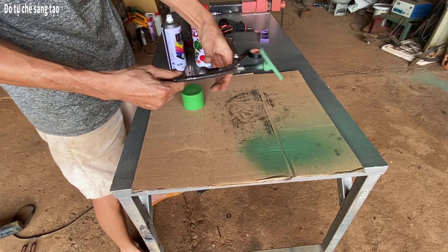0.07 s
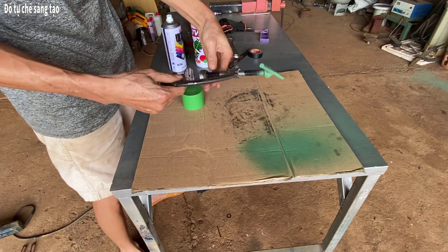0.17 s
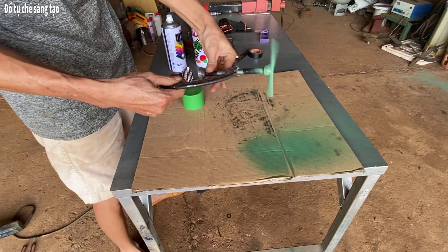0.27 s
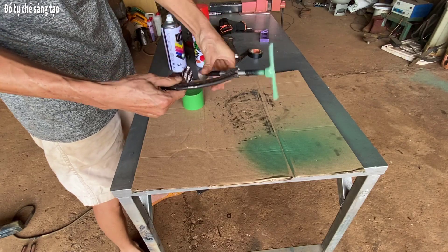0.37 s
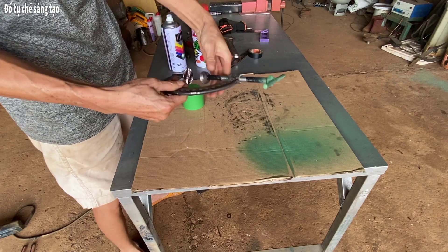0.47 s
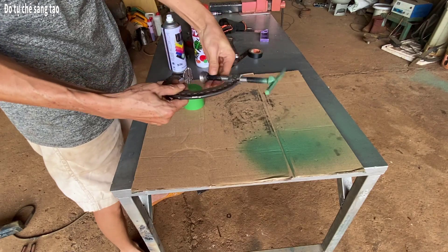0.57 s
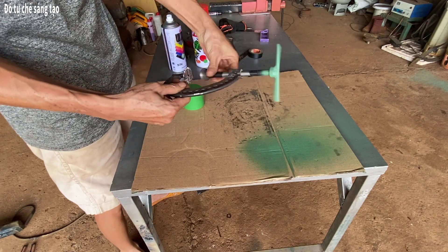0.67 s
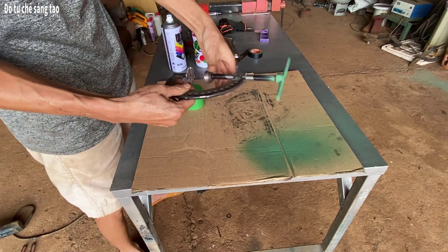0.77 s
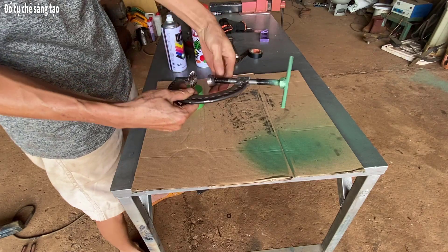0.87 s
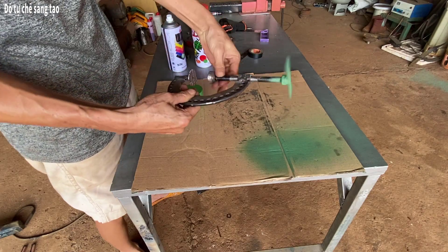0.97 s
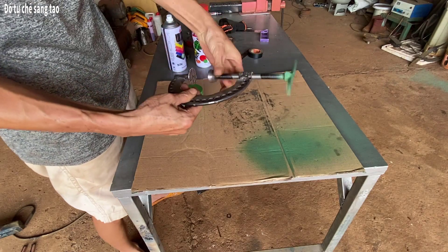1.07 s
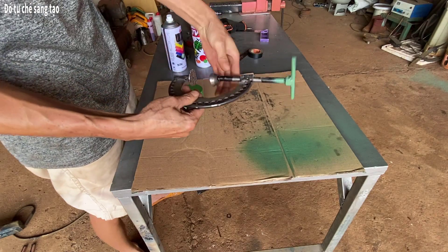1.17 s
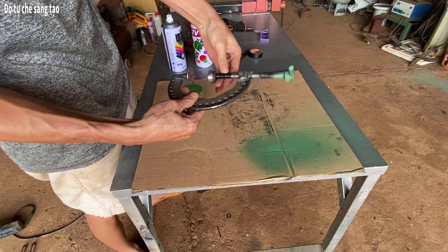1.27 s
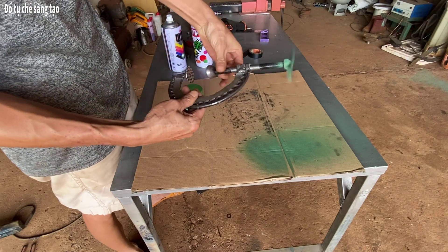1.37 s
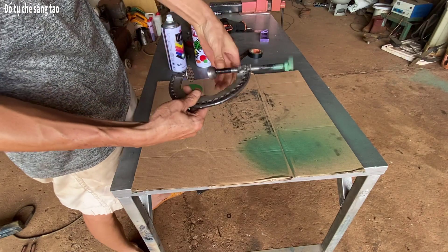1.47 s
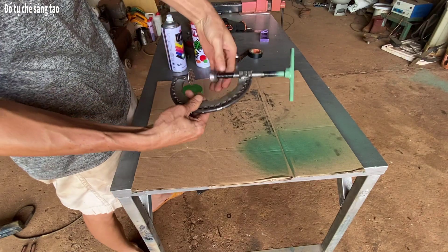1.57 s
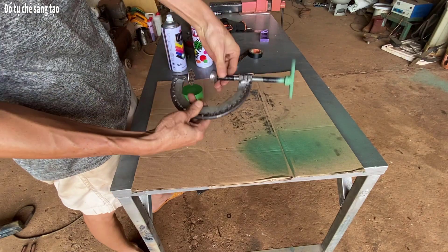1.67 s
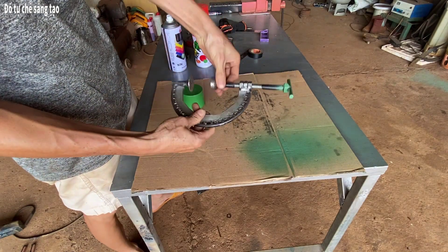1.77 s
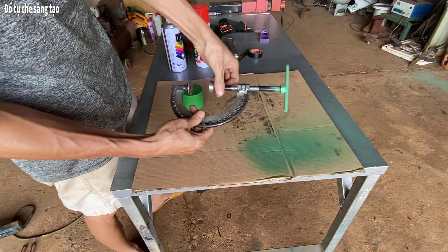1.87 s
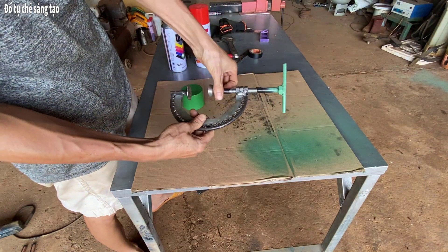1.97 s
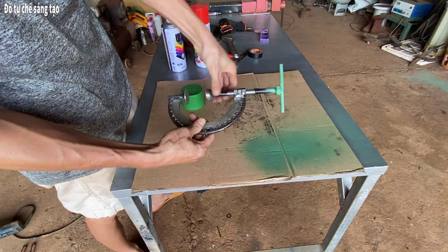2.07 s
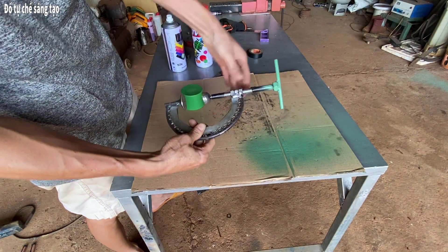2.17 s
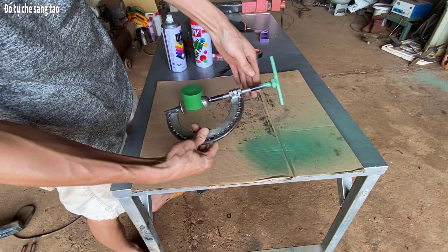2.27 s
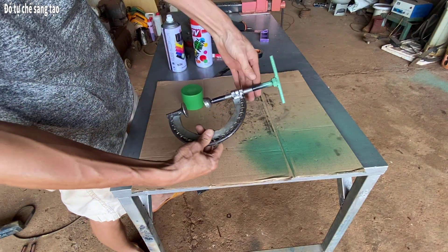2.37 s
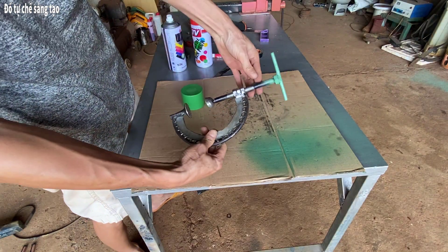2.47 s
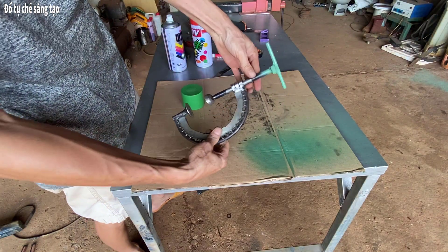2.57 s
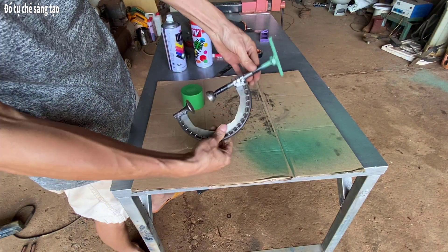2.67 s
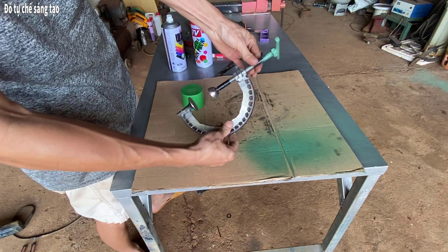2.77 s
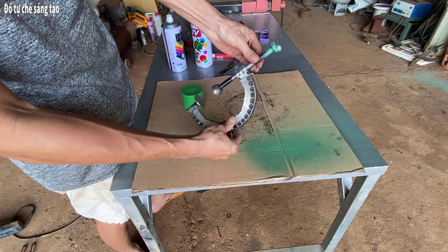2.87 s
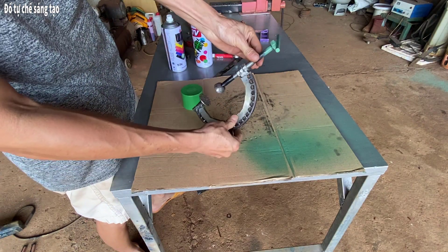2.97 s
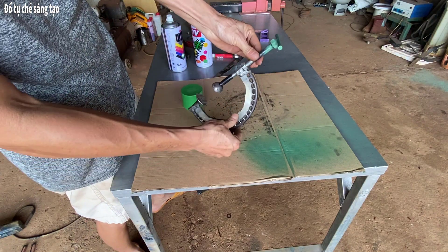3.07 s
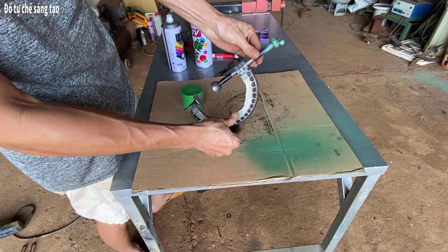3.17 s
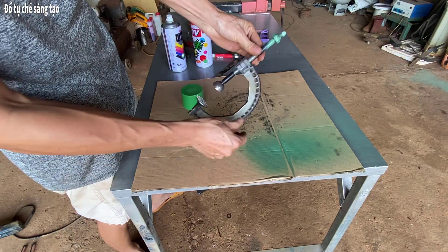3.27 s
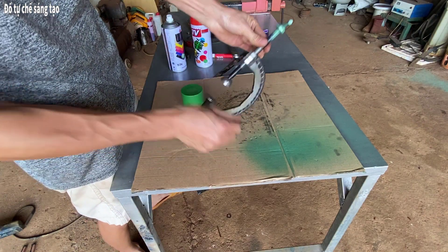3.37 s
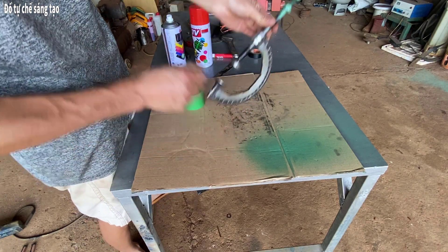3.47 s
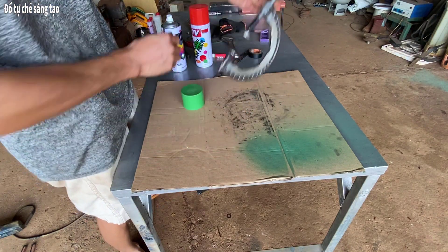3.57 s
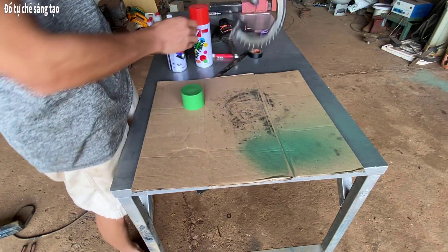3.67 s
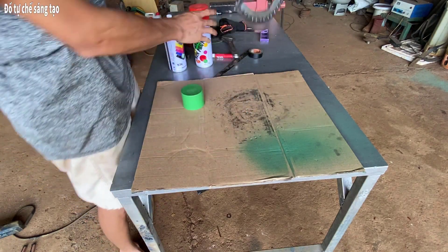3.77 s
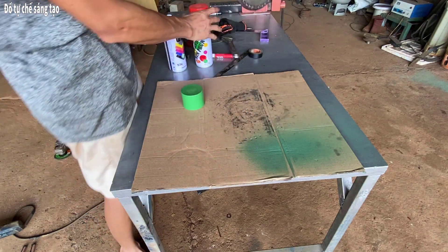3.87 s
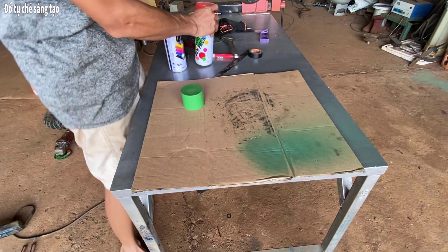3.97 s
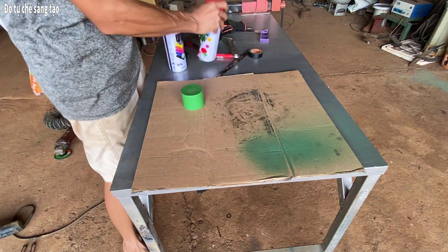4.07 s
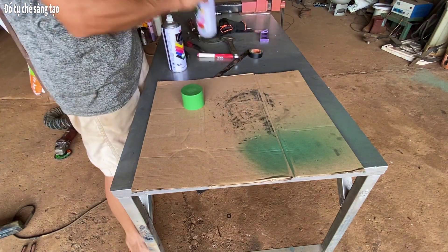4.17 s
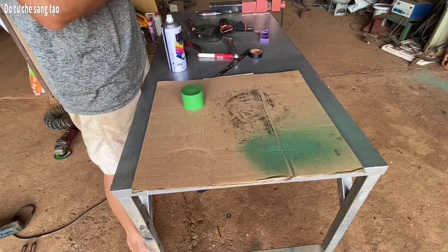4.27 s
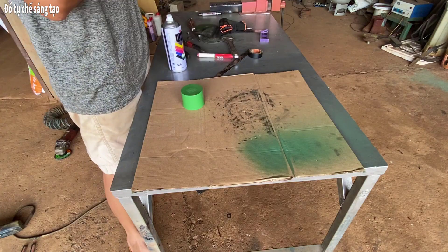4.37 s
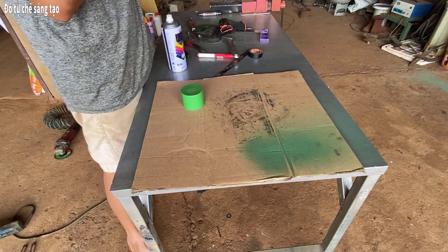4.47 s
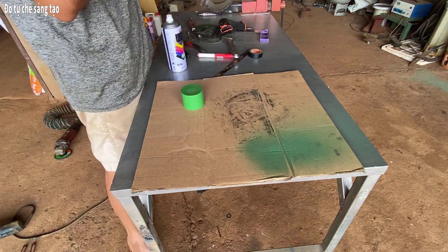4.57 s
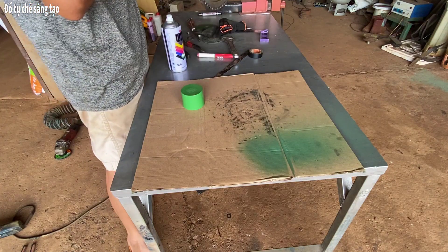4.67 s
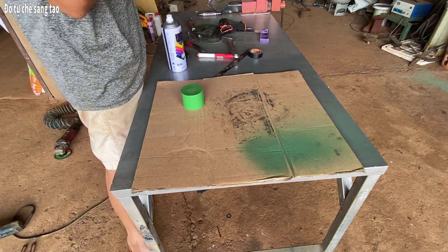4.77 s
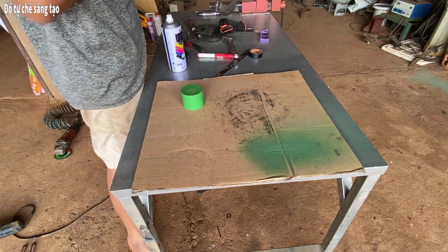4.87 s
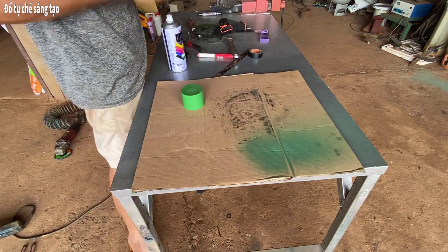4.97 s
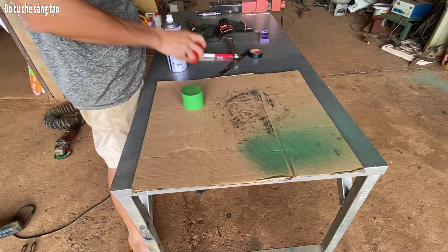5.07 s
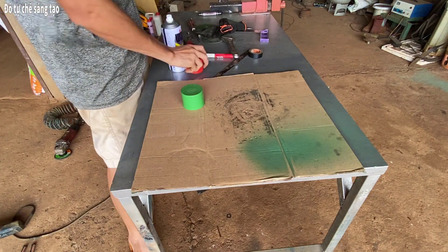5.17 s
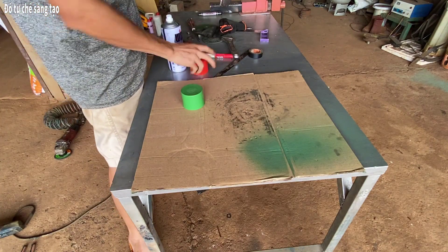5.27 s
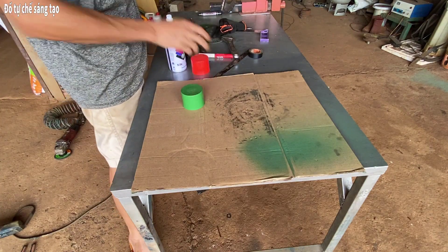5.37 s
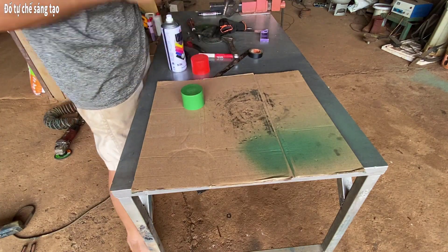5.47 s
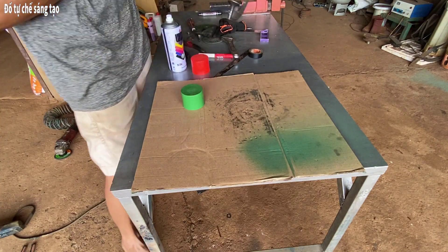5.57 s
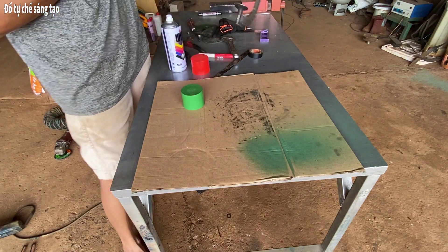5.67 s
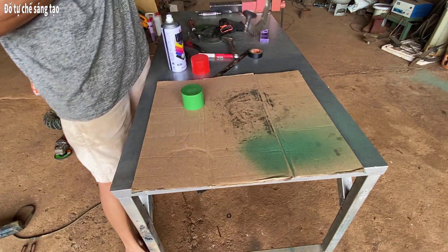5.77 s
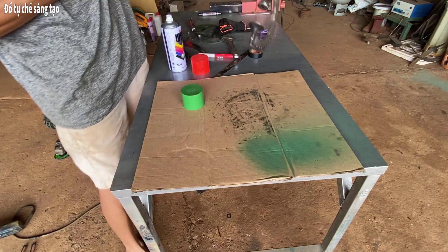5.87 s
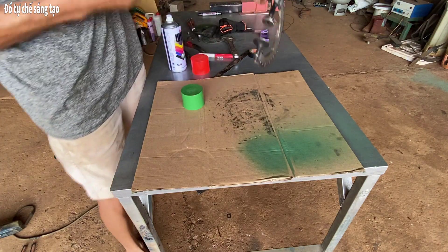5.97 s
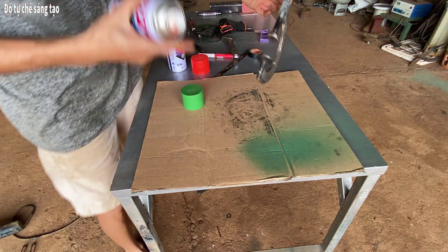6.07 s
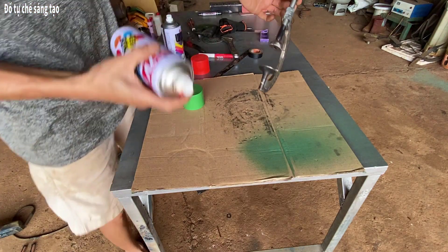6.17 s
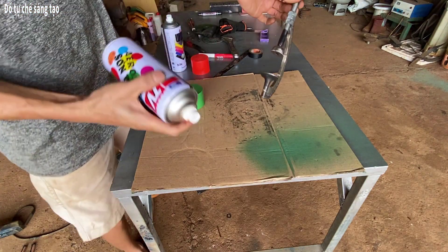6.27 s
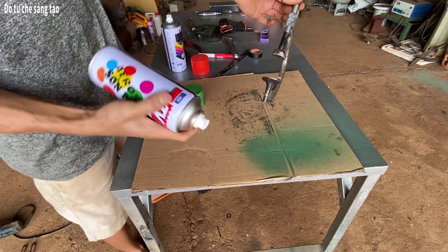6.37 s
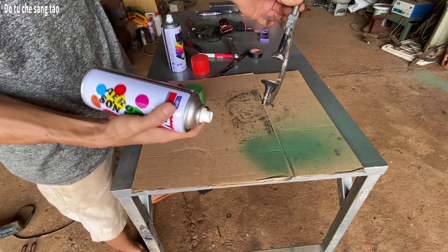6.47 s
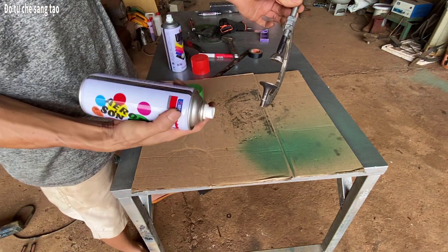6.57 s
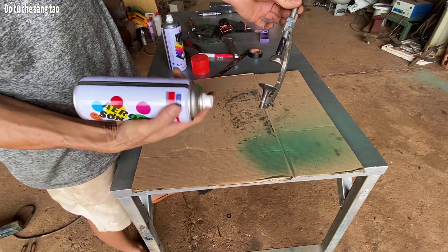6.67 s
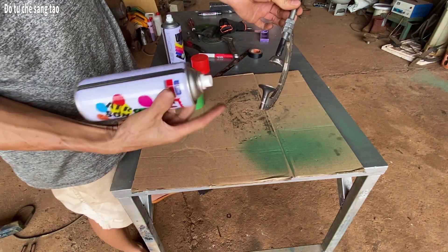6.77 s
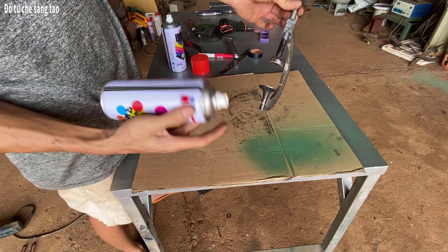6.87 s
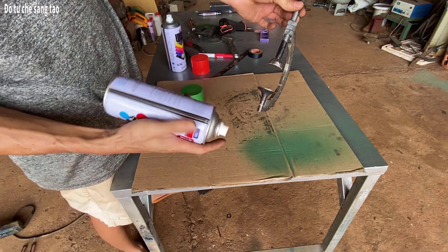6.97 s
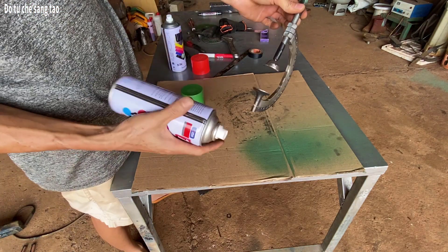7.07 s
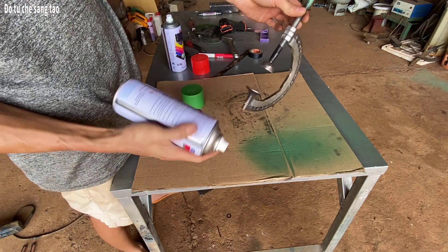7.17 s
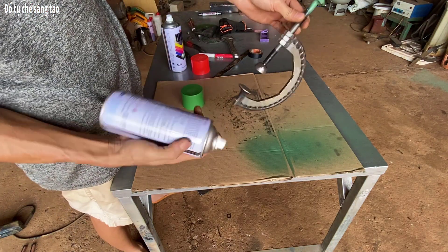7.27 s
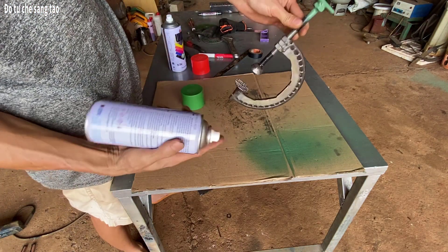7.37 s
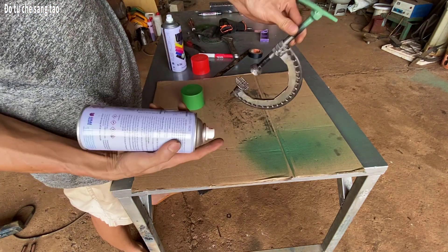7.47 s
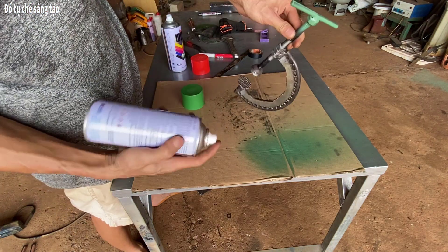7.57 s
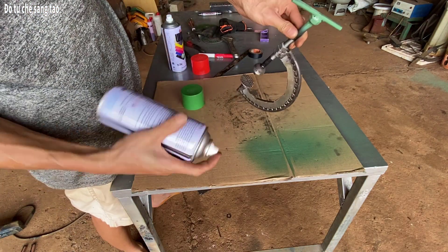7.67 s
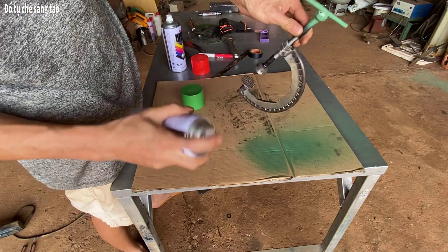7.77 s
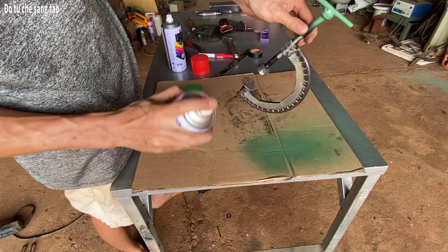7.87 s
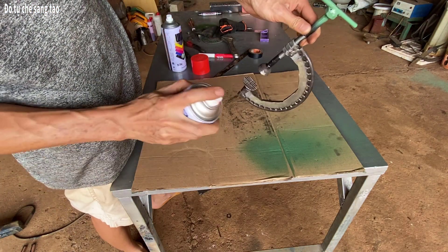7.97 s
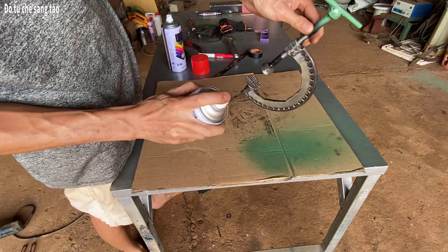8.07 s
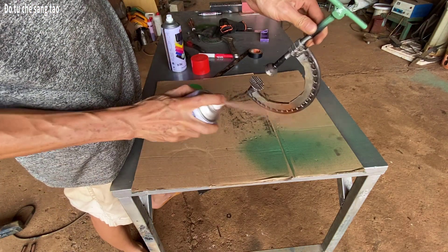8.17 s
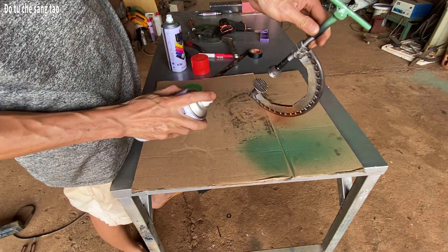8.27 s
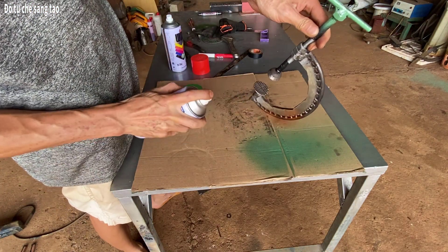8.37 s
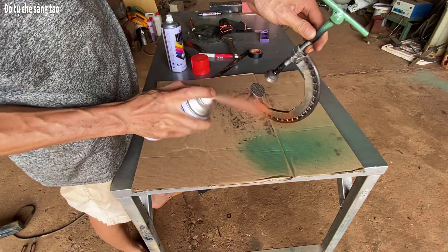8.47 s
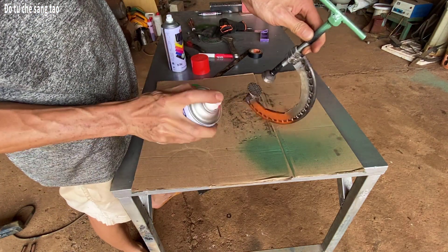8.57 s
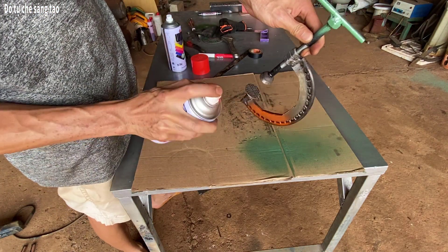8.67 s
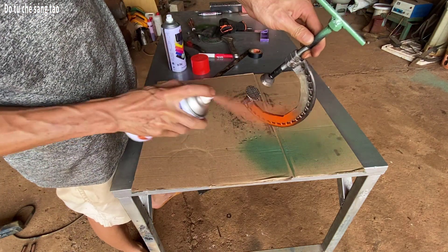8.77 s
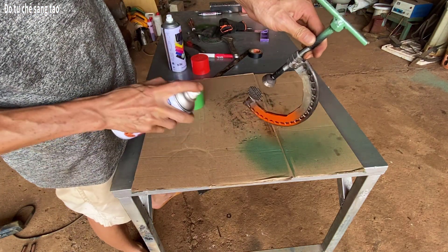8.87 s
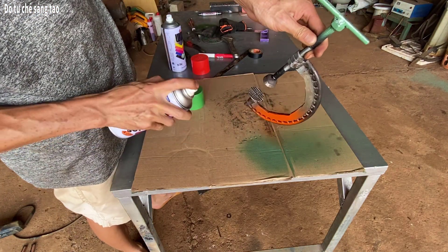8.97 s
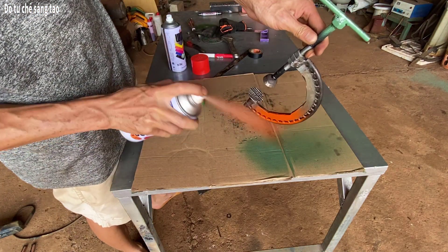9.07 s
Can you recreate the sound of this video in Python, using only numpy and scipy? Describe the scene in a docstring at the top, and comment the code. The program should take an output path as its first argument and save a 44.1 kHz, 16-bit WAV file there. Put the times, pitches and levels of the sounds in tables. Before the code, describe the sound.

A workshop heard close in stereo, with soft low rumble, airy hiss and a wavering low hum, strongest at first; the rumble pulses faintly for two seconds. From 0 to 1.7 s a loose clamp handle gives tiny bright metallic ticks, slightly left; a faint hoarse bird whistle falls, then rises around 0.8-1.2 s. It is nearly quiet until 3.75 s, when a light clank and a dull thud at 3.96 lead to clustered tool clanks, plastic snaps and short scrapes at 4.35-4.9, with a firm thud at 4.77. A hollow cap taps at 5.27 and bounces and skids by 5.42. The can's ball cracks hard at 6.43 and 7.06, each followed by irregular dry knocks and rolling, ending near 7.7. From 8.11 button clicks accompany short sputtering bright hisses at 8.13, 8.36 (very brief), 8.47, 8.74 and 9.05, with a slight room wash.

```python
"""Clanks and thuds on a steel bench, a ball knocking in a spray can and short nozzle hisses in a workshop.
Before them a clamp screw ticks and a bird calls; a plastic cap is popped and set down; rumble, hiss and hum go on.
Blows ring damped modes under a noise crack; slides and rolling are gritty noise; the jet is sputtering noise.
Two microphone ports hear most near sources with their own phase and level; a room wash follows."""
import sys
import numpy as np
from scipy import signal
from scipy.fft import rfft, irfft, next_fast_len
from scipy.io import wavfile
from scipy.ndimage import uniform_filter1d

SR = 44100
rng = np.random.default_rng(int(sys.argv[2]) if len(sys.argv) > 2 else 0)


def pcm_store(signal):
    """Save signal as 16-bit PCM."""
    levels = np.round(np.clip(np.atleast_2d(signal), -1, 1) * 32767)
    wavfile.write(sys.argv[1], SR, levels.astype(np.int16).T)


N = 402612
T = np.arange(N) / SR
SIZE = next_fast_len(N + SR)
F = np.maximum(np.arange(SIZE // 2 + 1) * SR / SIZE, 1)  # FFT bins [Hz], kept off zero for logs

# Ringing modes of the spray can: (frequency [Hz], level [dB], t60 [s])
CAN_MODES = [(850, -3, .03), (1450, -3, .035), (1900, -2, .025), (2557, 4, .03), (2885, 4, .035),
             (3386, 4, .028), (3700, 3, .022), (4250, 4, .024), (4950, 3, .022), (5670, 2, .024),
             (6350, 1, .014), (8050, 2, .016), (9160, 3, .01)]


def undb(db):
    """Gain of a level in dB."""
    return 10 ** (np.asarray(db) / 20)


def unit(x):
    """Scaled to rms 1."""
    return x / np.sqrt(np.mean(x ** 2))


def shaped(x, gain):
    """Sound filtered by a gain for each frequency of F."""
    return irfft(rfft(x, SIZE) * gain, SIZE)[..., :N]


def colour(points):
    """Gain on F, interpolated in dB over log frequency."""
    hz, db = np.transpose(points)
    return undb(np.interp(np.log(F), np.log(hz), db))


def band(hz, octaves):
    """Bell-shaped gain on F."""
    return np.exp(-.5 * (np.log2(F / hz) / octaves) ** 2)


def passband(x, lo_hz, hi_hz):
    """Band-pass, peak 1."""
    edges_hz = np.clip([lo_hz, hi_hz], 50, .45 * SR)
    y = signal.sosfilt(signal.butter(3, edges_hz, "band", fs=SR, output="sos"), x)
    return y / abs(y).max()


def gains(table):
    """Each dB column of a curve as a gain in time, all but silent (-200 dB) outside its span."""
    s, *columns = np.transpose(table)
    return [undb(np.interp(T, s, db, -200, -200)) for db in columns]


def held(start_s, hold_s, db, attack_s, fade_db_per_s):
    """Gain in time of events that rise, hold and fade."""
    age_s = T - np.array(start_s)[:, None]
    fade_s = np.clip(age_s - attack_s - np.array(hold_s)[:, None], 0, 1)
    rise = np.clip(age_s / attack_s, 0, 1) ** 2
    return (undb(db)[:, None] * rise * undb(-fade_db_per_s * fade_s)).sum(axis=0)


def walk(rate_hz):
    """Random levels, held 1 / rate and slewed twice, rms 1."""
    k = int(SR / rate_hz)
    steps = np.repeat(rng.standard_normal(N // k + 1), k)
    return unit(uniform_filter1d(uniform_filter1d(steps, k), k)[:N])


def grit(hz, octaves, rate_hz, spread_db, smooth_db):
    """Tiny uneven contacts over a smooth rub, in one broad band, rms 1."""
    contacts = rng.random(N) < rate_hz / SR
    sizes = undb(spread_db * np.minimum(rng.exponential(size=N), 3))
    hits = contacts * sizes * rng.standard_normal(N)
    rub = undb(smooth_db) * rng.standard_normal(N)
    return unit(shaped(unit(hits) + rub, band(hz, octaves)))


def blows(table, modes, length_s, octaves, crack_db, crack_s, rise_s, detune,
          rattle_db, rattle_hz, rattle_s, scatter_db=1.0):
    """Each blow rings the modes near its contact pitch under a short crack; loose parts rattle after it."""
    damp_s = .005  # time constant once a hand stops the ring
    rattle_db_per_db, firm_blow_db = 0.99, -21.5  # a softer blow rattles more for its size
    out, t = np.zeros(N + SR), T[:int(length_s * SR)]
    hz, db, t60 = np.transpose(modes)[:, :, None]
    for s, peak_db, contact_hz, *free_s in table:
        chance = rng.standard_normal((2, len(modes), 1))
        noise = rng.standard_normal((2, len(t)))

        share = undb(db + scatter_db * chance[0])
        share = share * np.exp(-.5 * (np.log2(hz / contact_hz) / octaves) ** 2)
        mode_hz = hz * (1 + detune * chance[1])
        ring = (share * np.sin(2 * np.pi * mode_hz * t) * 1000 ** (-t / t60)).sum(axis=0)
        ring = ring * np.exp(-np.maximum(t - min(free_s + [1]), 0) / damp_s)

        crack = passband(noise[0] * np.exp(-t / crack_s),
                         contact_hz / 2 ** octaves, contact_hz * 2 ** octaves)
        rattle = passband(noise[1] * np.exp(-t / rattle_s) * t / (t + 3 * rise_s), *rattle_hz)
        sound = (ring / abs(ring).max() + undb(crack_db) * crack) * (1 - np.exp(-t / rise_s))
        rattle_peak_db = firm_blow_db + rattle_db + rattle_db_per_db * (peak_db - firm_blow_db)
        i = int(s * SR)
        out[i:i + len(t)] += sound / abs(sound).max() * undb(peak_db) + rattle * undb(rattle_peak_db)
    return out[:N]


def ports(x, phase, pan_db):
    """The two ports hear one source with their own phase and level."""
    side = np.array([[0], [1]])
    turn = np.exp(1j * np.interp(F, *np.transpose(phase)) * side)
    return shaped(x, turn * undb(pan_db * (.5 - side)))


def bench():
    """Tools clank, things thud and slide on the steel top, the cap snaps loose."""
    # Tool blows: (time [s], peak [dB], contact pitch [Hz], time until the hand damps it [s])
    clank_blows = [(3.748, -39.5, 820, 0.08), (4.172, -34.5, 2590, 0.05), (4.36, -26, 1280, 0.029),
                   (4.376, -24, 1110, 0.043), (4.38, -26, 1900, 0.065), (4.437, -31.5, 1090, 0.026),
                   (4.478, -38.5, 696, 0.017), (4.512, -23, 1480, 0.0061), (4.549, -34, 1310, 0.018),
                   (4.621, -31, 1220, 0.017), (4.655, -38.5, 1070, 0.023), (4.804, -26.5, 1100, 0.0042),
                   (4.861, -33.5, 2610, 0.0081)]
    # Tool modes: (frequency [Hz], level [dB], t60 [s])
    tool_modes = [(560, -14, .3), (680, -8, .1), (880, -8, .1), (1089, 2, .3), (1270, -3, .12),
                  (1447, -8, .15), (1786, -5, .2), (2101, -3, .2), (2550, -6, .15), (3290, 0, .1)]
    # Cap coming loose: (time [s], peak [dB], contact pitch [Hz])
    snap_blows = [(4.376, -27.5, 3980), (4.389, -24.5, 7500), (4.454, -25.5, 2980), (4.476, -23, 3030),
                  (4.703, -29, 5500), (4.72, -34, 5000), (5.064, -38.5, 5300)]
    # Dull blows on the top: (time [s], peak [dB], contact pitch [Hz])
    thud_blows = [(3.958, -29.5, 447), (4.7695, -21.5, 740), (4.772, -25, 235), (6.025, -46.5, 604)]
    # Bench modes: (frequency [Hz], level [dB], t60 [s])
    bench_modes = [(150, 4, 0.14), (202, 2, 0.085), (340, -32, 1), (305, 2, 0.014), (415.5, 1.5, 0.17),
                   (497, -10, 0.017), (810, 12, 0.032), (955, -7, 0.021)]
    # Things slid on the bench: (start [s], held [s], level [dB])
    slide_events = [(3.739, 0.015, -42.5), (3.956, 0.0074, -48), (4.118, 0.074, -51), (4.358, 0.15, -42),
                    (4.618, 0.012, -49.5), (4.683, 0.11, -45), (4.8, 0.28, -51.5)]
    clanks = blows(clank_blows, tool_modes, .3, 0.22, crack_db=-9, crack_s=0.004, rise_s=0.0008,
                   detune=0.002, rattle_db=-7.0, rattle_hz=(1400, 15000), rattle_s=0.0094)
    snaps = blows(snap_blows, CAN_MODES, 0.074, 0.66, crack_db=-4.5, crack_s=0.0013, rise_s=0.00049,
                  detune=0.048, rattle_db=-4, rattle_hz=(2500, 15000), rattle_s=0.0098)
    thuds = blows(thud_blows, bench_modes, 0.59, 0.63, crack_db=0.0, crack_s=0.003, rise_s=0.003,
                  detune=0.012, rattle_db=-14, rattle_hz=(200, 900), rattle_s=0.06)
    slides = held(*np.transpose(slide_events), attack_s=0.0066, fade_db_per_s=153)
    return clanks + snaps + slides * grit(2100, 1.15, 800, 2.2, 0), thuds


def can():
    """The ball cracks on the wall, whose ring the paint damps at once, and rolls down the tilted can."""
    # Ball on wall: (time [s], peak [dB], contact pitch [Hz])
    knock_blows = [(6.43, -13, 4650), (6.4325, -28, 4960), (6.4963, -29.5, 1700), (6.509, -30, 2020),
                   (6.539, -39, 5860), (6.567, -18.5, 3870), (6.601, -42, 5500), (6.6152, -35, 4600),
                   (6.6215, -44, 6050), (6.639, -29.5, 3480), (6.6472, -32, 4850), (6.675, -34, 4970),
                   (6.6825, -26.5, 4250), (6.7256, -33, 6340), (7.0602, -13, 3240), (7.1074, -34, 2800),
                   (7.152, -41, 3240), (7.217, -23, 3420), (7.2195, -17.5, 6400), (7.2505, -28.5, 4400),
                   (7.27, -34, 2000), (7.31, -38, 4200), (7.3262, -30, 4070), (7.3412, -26.5, 4520),
                   (7.3836, -29, 2850), (7.4062, -36, 4300), (7.618, -43, 5400), (7.672, -24, 4320)]
    # Ball rolling in the tilted can: (start [s], held [s], level [dB])
    tilts = [(6.43, 0.2, -45.5), (7.06, 0.058, -49), (7.22, 0.14, -52.5), (7.669, 0.015, -50.5)]
    knocks = blows(knock_blows, CAN_MODES, .15, 0.56, crack_db=-2.5, crack_s=0.0012, rise_s=0.00042,
                   detune=0.036, rattle_db=-6.5, rattle_hz=(2000, 15000), rattle_s=0.0028, scatter_db=3.5)
    rolling = held(*np.transpose(tilts), attack_s=0.0055, fade_db_per_s=105)
    return knocks + rolling * grit(2700, 1.1, 500, 2.2, 1)


def button():
    """The nozzle button clicks drily on the can as it is pushed and let go."""
    # Button clicks: (time [s], peak [dB], contact pitch [Hz])
    clicks = [(8.1126, -21, 1530), (8.1246, -15, 7400), (8.128, -21.5, 3420), (8.313, -25, 2920),
              (8.358, -15, 7000), (8.3835, -31, 5000), (8.4572, -34, 6800), (8.5005, -20.5, 8700),
              (8.6509, -28, 7500)]
    return blows(clicks, CAN_MODES, .05, 0.73, crack_db=4.5, crack_s=0.0015, rise_s=0.00067,
                 detune=0.04, rattle_db=-2, rattle_hz=(1200, 15000), rattle_s=0.0025)


def nozzle():
    """Turbulent jet that sputters, a broad rough roar where it meets metal, and a wide plume unlike at the two
    ports."""
    # Presses: (start [s], held [s], jet level [dB], roar level above the jet [dB])
    presses = [(8.127, 0.13, -33, -10), (8.359, 0.0039, -37, -11.5), (8.469, 0.089, -32, -11),
               (8.741, 0.079, -33.5, -16), (9.048, .1, -33.5, -9.5)]
    # Jet spectrum: (frequency [Hz], level per Hz [dB])
    jet_spectrum = [(880, -46), (1500, -8), (2660, -2), (2970, -7.5), (5600, 0), (8240, 8), (9750, 5),
                    (12100, 15.5), (13500, 6), (14800, 10), (16000, -32)]
    attack_s, fade_db_per_s = 0.02, 300
    leak_db, leak_fade_db_per_s = -30, 98  # a weak leak goes on after the valve shuts
    start_s, hold_s, db, roar_db = np.transpose(presses)
    jet = held(start_s, hold_s, db, attack_s, fade_db_per_s)
    roar = held(start_s, hold_s, db + roar_db, attack_s, fade_db_per_s)
    jet = jet + held(start_s, hold_s, db + leak_db, attack_s, leak_fade_db_per_s)
    hiss = 0
    for hz in (2000, 5000, 9000, 14000):  # each band sputters on its own
        part = shaped(rng.standard_normal(N), colour(jet_spectrum) * band(hz, .5))
        hiss = hiss + part * undb(2.2 * walk(60))
    hiss = unit(hiss) * undb(1.7 * walk(25))
    plume = shaped(rng.standard_normal((2, N)), colour(jet_spectrum) * band(5900, 0.59))
    return jet * hiss + roar * grit(610, 7.3, 440, 4.3, 1.6), jet * undb(-7.0) * unit(plume)


def cap():
    """The hollow cap bounces dully, then skids to rest."""
    # Cap on bench: (time [s], peak [dB], contact pitch [Hz])
    tap_blows = [(5.2715, -17, 1130), (5.364, -23, 690), (5.416, -31, 3000), (5.417, -21.5, 653)]
    # Cap modes: (frequency [Hz], level [dB], t60 [s])
    cap_modes = [(480, -3, .04), (581, -2, .06), (680, 0, .08), (780, -4, .05), (1109, 0, .045),
                 (1491, -3, .03), (1760, -4, .03), (2350, -2, .035), (2900, -3, .04)]
    taps = blows(tap_blows, cap_modes, 0.36, 0.65, crack_db=-5.0, crack_s=0.0029, rise_s=0.00063,
                 detune=0.026, rattle_db=-9, rattle_hz=(420, 2200), rattle_s=0.028)
    skid = held([5.415], [0.012], [-37], attack_s=0.0017, fade_db_per_s=382)
    return taps + skid * grit(2400, 0.82, 900, 2.6, -1.3)


def screw():
    """The loose handle of the twirled screw ticks and chatters."""
    # Handle ticks: (time [s], peak [dB], contact pitch [Hz])
    ticks = [(0.0024, -35.5, 5530), (0.0238, -35.5, 7440), (0.3057, -48, 5100), (0.397, -34, 7800),
             (0.6797, -42, 5670), (0.7077, -34, 5380), (0.7264, -34, 7360), (1.0462, -42, 5170),
             (1.0715, -36.5, 7700), (1.104, -40, 5400), (1.3353, -36, 7600), (1.3718, -40, 7260),
             (1.4296, -47.5, 6390), (1.6706, -51, 5260), (1.736, -50.5, 5200), (2.6213, -45, 5770)]
    # Screw modes: (frequency [Hz], level [dB], t60 [s])
    screw_modes = [(2100, -6, .02), (5520, 0, .14), (7600, -3, .02), (8700, -5, .015), (10500, -5, .012)]
    return blows(ticks, screw_modes, 0.12, 0.56, crack_db=10.5, crack_s=0.00027, rise_s=0.00006,
                 detune=0.0026, rattle_db=-5, rattle_hz=(2000, 13000), rattle_s=0.015)


def bird():
    """Hoarse gliding whistles, one falling and then fainter rising ones, with a near echo."""
    # Notes: (start [s], length [s], first pitch [Hz], pitch it glides toward [Hz], level [dB])
    notes = [(.826, .07, 5300, 1900, -56), (.893, .03, 2400, 3300, -60), (1.05, .19, 2750, 3100, -66)]
    glide = .6  # time constant, as a share of the note
    echo_s, echo_db = .014, -3
    out = 0
    for s, length_s, first_hz, last_hz, db in notes:
        u = np.clip((T - s) / length_s, 0, 1)
        hz = last_hz + (first_hz - last_hz) * np.exp(-u / glide)
        phase = 2 * np.pi * np.cumsum(hz * (1 + 0.045 * walk(400))) / SR
        swell = np.sin(np.pi * u) ** .6 * (u < 1)
        out = out + undb(db + 2.5 * walk(300)) * swell * np.sin(phase)
    return out + undb(echo_db) * np.roll(out, int(echo_s * SR))


def room(near):
    """Roof and walls return a dull decaying wash, different at each port."""
    t60_s, low_hz, top_hz, level_db = 0.47, 366, 5300, 1.5
    t = T[:SR]
    echo = rng.standard_normal((2, SR)) * 1000 ** (-t / t60_s) * (1 - np.exp(-t / 0.00031))
    echo = echo / np.sqrt(np.sum(echo ** 2, axis=1, keepdims=True))
    dulling = np.sqrt((1 + (low_hz / F) ** 2) * (1 + (F / top_hz) ** 4))
    return shaped(near, undb(level_db) * rfft(echo, SIZE) / dulling)


def swells():
    """Faint narrow bands of noise that rise and fade, unrelated at the two ports."""
    # Swells: (centre [s], half length [s], frequency [Hz], level [dB])
    swell_events = [(1.1, 0.17, 796, -68), (3.05, 0.26, 225, -65), (3.86, 0.11, 530, -60),
                    (4.047, 0.076, 134, -51.5), (5.06, 0.16, 350, -51)]
    out = np.zeros((2, N))
    for s, half_s, hz, db in swell_events:
        i = slice(max(int((s - 2 * half_s) * SR), 0), int((s + 2 * half_s) * SR))
        noise = passband(rng.standard_normal((2, len(T[i]))), hz / 1.15, hz * 1.15)
        out[:, i] += undb(db) * unit(noise) * np.exp(-((T[i] - s) / half_s) ** 2)
    return out


def background():
    """Far rumble and airy hiss partly shared by the ports, a wavering hum, and a faint unshared treble hiss."""
    # Levels: (time [s], rumble [dB], hiss [dB], hum [dB])
    levels = [(0, -61.5, -58, -60.5), (2, -59.5, -58, -73.5), (4, -57, -59, -69.5), (6, -58, -59.5, -65.5),
              (8, -59, -59.5, -70), (9.13, -58.5, -58, -74)]
    # Rumble spectrum: (frequency [Hz], level per Hz [dB])
    rumble_spectrum = [(15, -86), (25, -17), (50, -8), (82, 2), (130, -0.5), (170, -8), (250, -15.5),
                       (430, -17.5), (800, -22), (1500, -61)]
    # Hiss spectrum: (frequency [Hz], level per Hz [dB])
    hiss_spectrum = [(600, -27), (1000, -2), (1500, -4), (2100, 0.5), (3200, 2.5), (4900, 5.5), (6000, 2),
                     (7500, -9.5), (9500, -36), (12300, -49), (13500, -9.5), (14500, -90.5)]
    # Likeness of the ports: (frequency [Hz], share of power common to both [0-1])
    likeness = [(60, 0.93), (130, 0.92), (290, 0.53), (640, 0.013), (3000, 0.012)]
    # Faint treble hiss: (time [s], level [dB])
    air_levels = [(0, -100), (1.6, -100), (2.2, -103), (3.5, -104), (3.9, -68.5), (5.2, -66), (5.55, -92),
                  (5.7, -69), (7.5, -76), (9.13, -73)]
    hum_hz = 134.4
    throb_hz, throb_db, throb_end_s = 19.5, 5.5, 2.0  # even rumble pulses, fading over the last second
    rumble, hiss, hum = gains(levels)
    throb = np.clip(throb_end_s - T, 0, 1) * np.sin(2 * np.pi * throb_hz * T)
    rumble = rumble * undb(throb_db * throb)
    hz, share = np.transpose(likeness)
    share = np.clip(np.interp(np.log(F), np.log(hz), share), 0, 1)
    common, own = rfft(rng.standard_normal(SIZE)), rfft(rng.standard_normal((2, SIZE)))
    noise = np.sqrt(share) * common + np.sqrt(1 - share) * own
    hum = hum * undb(4.0 * walk(6.7))
    out = hum * np.sin(2 * np.pi * np.cumsum(hum_hz * (1 + 0.0213 * walk(2.6))) / SR)
    for gain, points, flicker_db in ((rumble, rumble_spectrum, .8), (hiss, hiss_spectrum, .4)):
        layer = unit(irfft(noise * colour(points), SIZE)[:, :N])
        out = out + gain * undb(flicker_db * walk(26)) * layer
    air = unit(irfft(own * band(10400, 0.26), SIZE)[:, :N])
    return out + gains(air_levels)[0] * air


def scene():
    """Near sources reach the ports directly and through the room, over the background."""
    # Phase of the right port against the left, for most near sources: (frequency [Hz], phase [rad])
    near_phase = [(0, 0), (1400, -1.6), (2500, -3), (4800, -6), (8300, -6.9), (9650, -6.4), (11700, -3.5),
                  (15200, 2)]
    # The same for the jet: (frequency [Hz], phase [rad])
    jet_phase = [(0, 0), (1400, -1.3), (3450, -3.1), (6200, -7.5), (7600, -10), (8300, -9.6), (9650, -6.6),
                 (15200, 2)]
    # The same for the cap: (frequency [Hz], phase [rad])
    cap_phase = [(0, 0), (1030, -1.3), (1810, 0), (3360, -2.2), (15200, -4)]
    # The can moves toward the middle: (time [s], left over right [dB])
    can_pan = [(6, 9), (6.6, 5.5), (7.2, 6), (8, 4)]
    hand, call, tin = screw(), bird(), can() + button()
    (top, thuds), lid, (jet, plume) = bench(), cap(), nozzle()
    pan_db = np.interp(T, *np.transpose(can_pan))
    direct = ports(hand, near_phase, pan_db=7.5)
    direct = direct + ports(tin, near_phase, pan_db=0) * undb([pan_db / 2, -pan_db / 2])
    direct = direct + ports(top, near_phase, pan_db=5) + ports(thuds, near_phase, pan_db=-0.5)
    direct = direct + ports(lid, cap_phase, pan_db=2) + ports(jet, jet_phase, pan_db=0)
    can_wet_db, bench_wet_db, cap_wet_db = -10, -7.5, -6
    sent = hand + call + jet + undb(can_wet_db) * tin
    sent = sent + undb(bench_wet_db) * (top + thuds) + undb(cap_wet_db) * lid
    return direct + call + plume + room(sent) + background() + swells()


def record(dry):
    """A doubled notch removes one narrow treble band; a steep low-pass cuts the top."""
    notch_hz, notch_width_hz, top_hz = 11950, 1000, 16200
    notch = signal.tf2sos(*signal.iirnotch(notch_hz, notch_hz / notch_width_hz, SR))
    low_pass = signal.ellip(10, .2, 70, top_hz, fs=SR, output="sos")
    return signal.sosfilt(np.vstack([notch, notch, low_pass]), dry)


dry = scene()
out = record(dry)
pcm_store(out)
```